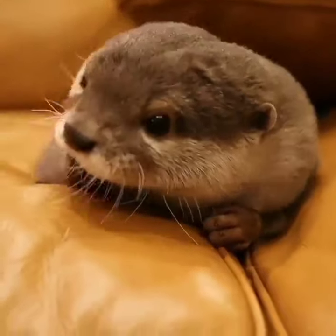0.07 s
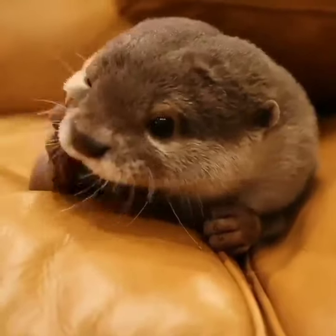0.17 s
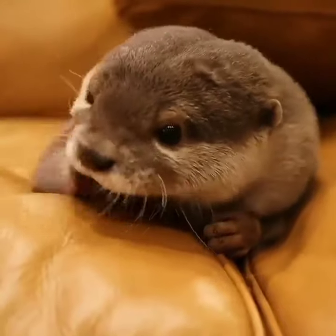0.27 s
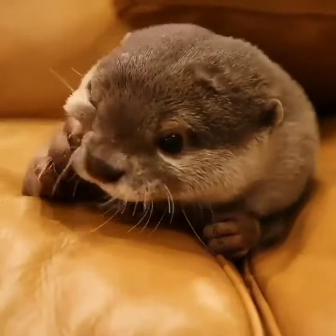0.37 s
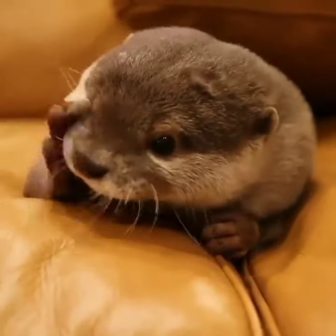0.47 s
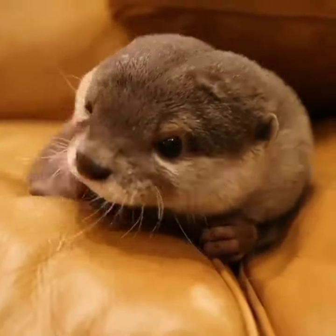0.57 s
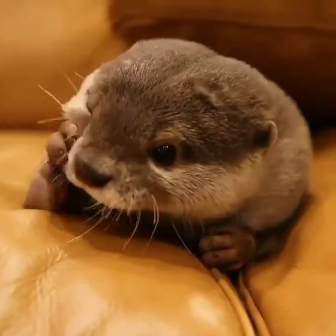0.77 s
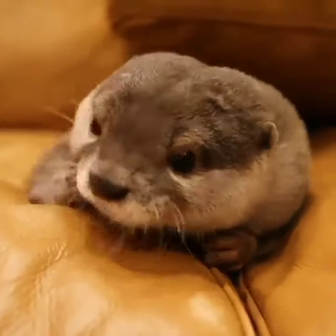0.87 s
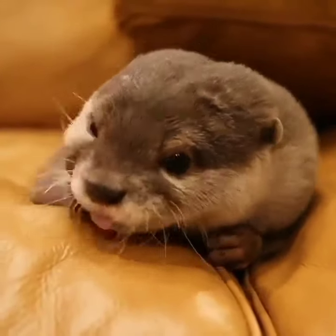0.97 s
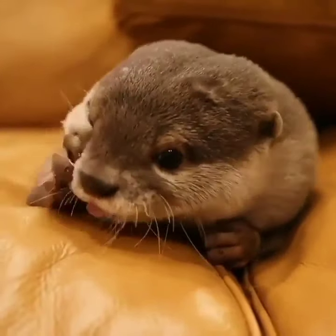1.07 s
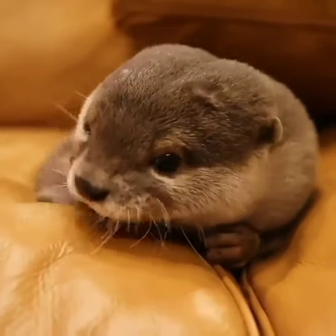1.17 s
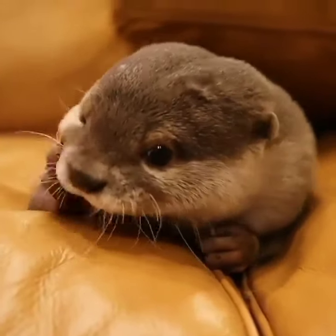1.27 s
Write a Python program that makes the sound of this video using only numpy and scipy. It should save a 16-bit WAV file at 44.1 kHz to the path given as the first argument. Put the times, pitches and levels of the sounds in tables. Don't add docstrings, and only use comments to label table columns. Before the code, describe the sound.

Single high otter squeal rises, wavers and sinks, then faint lip smacks over soft room hiss

```python
import sys
import numpy as np
from scipy import signal
from scipy.fft import rfft, irfft, next_fast_len
from scipy.io import wavfile
from scipy.ndimage import uniform_filter1d, map_coordinates

SR = 44100
rng = np.random.default_rng(int(sys.argv[2]) if len(sys.argv) > 2 else 0)


def waveform_to_disk(signal):
    frames = np.transpose(np.atleast_2d(signal))
    scaled = np.clip(frames, -1, 1) * 32767
    samples = np.round(scaled).astype(np.int16)
    wavfile.write(sys.argv[1], SR, samples)


def boost(x):
    u = np.asarray(x, float) / 20
    return 10 ** u


N = 57330


def unit(x):
    return x / np.sqrt(np.mean(x ** 2) + 1e-20)


def along(points, hz):
    f, v = np.transpose(points)
    return np.interp(np.log(hz + 1), np.log(f + 1), v)


def wobble(rate):
    knots = rng.standard_normal(int(N * rate / SR) + 4)
    return map_coordinates(knots, [np.arange(N) * rate / SR])


def filtered(x, response):
    m = next_fast_len(N + SR // 2)
    return irfft(rfft(x, m) * response(np.fft.rfftfreq(m, 1 / SR)), m)[..., :N]


def gate(start, end, rise, fall):
    t = np.arange(N) / SR
    return np.clip((t - start) / rise + .5, 0, 1) * np.clip((end - t) / fall + .5, 0, 1)


def patchy(depth_db):
    z = signal.stft(rng.standard_normal((2, N)), nperseg=512)[2]
    field = uniform_filter1d(rng.standard_normal(z.shape[1:]), size=7, axis=0)
    field = uniform_filter1d(field, size=9, axis=1)
    return signal.istft(z * boost(depth_db * unit(field)), nperseg=512)[1][:, :N]


def squeal(count=11):
    # start_s, pitch_hz, level_db, chest_tone_over_level_db, brightness_db
    call = [(0.213, 776, -36.5, 8.5, -4), (0.227, 792, -37, 8, 3), (0.255, 815, -33, 3, -0.5),
            (0.283, 852, -29, -15, 2.5), (0.313, 898.8, -25.5, -7, 1), (0.367, 888.5, -23, -6, 3.5),
            (0.407, 939.2, -20.5, -4, 4.5), (0.471, 909.3, -21.5, -6.5, 3),
            (0.541, 930.9, -20.5, -6.5, 1.5), (0.619, 914, -23, -5.5, 0), (0.705, 838.3, -26, -1, 1.5),
            (0.747, 841.7, -25.5, 2.5, 0.5), (0.805, 809, -28.5, -6, 2), (0.837, 808.6, -28.5, -0.5, -1),
            (0.927, 803, -31, -1, 1.5), (0.983, 807, -40.5, 9.5, 5), (0.988, 813, -37, 12, 6)]
    # frequency_hz, gain_db
    throat = [(1500, -5.5), (1850, 1.5), (2400, -7), (2800, -8), (3600, -26.5), (5500, -25.5),
              (7200, -31.5), (8300, -23)]
    # frequency_hz, share
    fuzz = [(1800, 0.056), (2800, 0.15), (3700, 0.36), (9000, 0.51)]
    # frequency_hz, lead_rad
    port_lead = [(900, .12), (1900, .25), (2700, 1.1), (4000, 1.5), (9000, 1.6)]
    # frequency_hz, wander_rad
    head_drift = [(900, .1), (2700, .2), (4000, .9), (9000, 1.3)]
    attack_s, release_s, end_s, gulp_s = .006, .005, .983, .006
    t = np.arange(N) / SR
    s, *cols = np.transpose(call)
    hz, level_db, chest_db, bright_db = [uniform_filter1d(np.interp(t, s, c), size=300) for c in cols]
    hz = hz * (1 + 0.0026 * wobble(250) + 0.00482 * wobble(45.03))

    gulp = np.exp(-((t - end_s + gulp_s) / gulp_s) ** 2)
    chest_db = chest_db + 4.5 * gulp
    hz = hz + 45 * gulp

    turn = 2 * np.pi * np.cumsum(hz) / SR
    strain = np.interp(hz, [797, 852], [.5, 1])
    sides = np.array([[1], [-1]])
    voice = 0
    for k in range(1, count + 1):
        db = chest_db
        if k > 1:
            db = along(throat, k * hz) - along(throat, 2 * hz) + bright_db * min(k - 2, 3) / 3
        scatter = np.array([wobble(170) + 1j * wobble(170), wobble(170) + 1j * wobble(170)])
        flutter = 1 + along(fuzz, k * hz) * strain * scatter
        lead = along(port_lead, k * hz) + along(head_drift, k * hz) * wobble(18.39)
        phase = k * turn + lead / 2 * sides - 0.268 * k * k
        late_s = (k - 1) * 0.0044
        opening = gate(s[0] + late_s / 2, 2, attack_s + late_s, 1)
        level = boost(db + 0.5 * wobble(29.83))
        voice = voice - (level * flutter * opening * np.exp(1j * phase)).real

    air = unit(filtered(rng.standard_normal((2, N)), lambda f: (f > 3300) * (f < 9700)))
    air = air * (1 + np.cos(turn))
    voice = np.sqrt(2) * voice + boost(-30 + bright_db + 4.4 * wobble(13)) * air
    return voice * boost(level_db) * gate(s[0], end_s, attack_s, release_s)


def catches():
    # start_s, pitch_hz, level_db, length_s
    bursts = [
        (0.203, 916, -29.5, 0.0132),
    ]
    t, out = np.arange(N) / SR, np.zeros(N)
    for s, hz, db, length in bursts:
        swell = np.sin(np.pi * np.clip((t - s) / length, 0, 1))
        out += boost(db) * np.sqrt(2) * swell * np.sin(2 * np.pi * hz * (t - s))
    return out


def smacks():
    # peak_s, level_db, top_hz
    lips = [
        (.979, -44, 2200),
        (1.132, -47, 3400),
        (1.224, -54, 6500),
    ]
    t, out = np.arange(N) / SR, np.zeros(N)
    for s, db, top_hz in lips:
        puff = rng.standard_normal(N)
        puff = unit(filtered(puff, lambda f: f / (f + top_hz / 3) / (1 + (f / top_hz) ** 8)))
        t60 = np.where(t > s, .06, .03)
        out += boost(db - 60 * np.abs(t - s) / t60) * puff
    return out


def leaks():
    # middle_s, length_s, level_db
    swells = [
        (0.261, 0.11, -46.5),
        (0.352, .035, -47.5),
        (0.4, 0.027, -47),
        (.55, 0.027, -58),
        (0.674, 0.076, -49),
        (0.766, 0.071, -49.5),
        (0.97, 0.026, -53.5),
        (1.048, 0.19, -55),
    ]
    # frequency_hz, density_db_per_hz
    colour = [(1800, -6), (2300, 5), (3200, -17), (4200, 7), (6500, -8.5), (8500, 0), (9700, -8.5)]
    t = np.arange(N) / SR
    swell = sum(boost(db) * np.exp(-(2 * (t - s) / length) ** 2) for s, length, db in swells)
    air = filtered(patchy(2.5), lambda f: boost(along(colour, f)) * (f > 1500) * (f < 9700))
    return swell * unit(air)


def thumps():
    # start_s, level_db, pitch_hz, t60_s
    pushes = [
        (.575, -33, 62, .25),
        (.645, -35, 66, .2),
        (1.02, -41, 66, .25),
        (.53, -44, 55, .1),
        (.86, -46, 52, .3),
        (.77, -42, 95, .2),
    ]
    out = np.zeros(N)
    for s, db, hz, t60 in pushes:
        t = np.clip(np.arange(N) / SR - s, 0, None)
        out += boost(db - 60 * t / t60) * (1 - np.exp(-t / 0.012)) * np.sin(2 * np.pi * hz * t) * 2
    return out


def hum():
    # frequency_hz, level_db
    lines = [(49, -56.5), (100, -47), (147, -54.5), (188, -53.5)]
    t, out = np.arange(N) / SR, 0
    for hz, db in lines:
        level = boost(db + 1.5 * wobble(9)) * np.sqrt(2)
        out = out + level * np.sin(2 * np.pi * hz * t + 1.2 * wobble(7))
    return out


def hiss():
    # frequency_hz, density_db_per_hz
    colour = [(18, -33), (30, -4), (161, -11), (193, -7), (590, -13), (910, -12.5), (1370, -16.5),
              (3420, -22.5), (13200, -34.5)]
    # frequency_hz, correlation
    alike = [(60, 1.0), (180, 0.97), (520, 0.33), (1520, -0.02), (4450, -0.2), (13100, -0.067)]

    def mid_side(hz):
        angle = np.arccos(np.clip(along(alike, hz), -1, 1)) / 2
        return boost(along(colour, hz)) * (hz > 34) * [np.cos(angle), np.sin(angle)]

    mid, side = filtered(patchy(1.5), mid_side)
    level = boost(-40.5 - 2.5 + 0.68 * wobble(5.55))
    return level * unit(np.array([mid + side, mid - side]))


def room(x):
    # delay_s, left_gain, right_gain
    echoes = [(.0017, -0.074, -.06), (.0041, .08, .06), (.009, .1, 0.074), (.016, -.07, -.03)]
    # frequency_hz, t60_s
    decay = [(200, 0.27), (800, 0.64), (2000, 0.33), (10000, 0.23)]
    delay, *gains = np.transpose(echoes)
    pan = boost(np.array([[0.36], [-0.36]]))
    near = filtered(x, lambda f: pan * (1 + np.array(gains) @ np.exp(-2j * np.pi * delay[:, None] * f)))

    hz, t, z = signal.stft(rng.standard_normal((2, SR // 3)), SR, nperseg=256)
    tail = signal.istft(z * boost(-60 * t / along(decay, hz)[:, None]), SR, nperseg=256)[1]
    shared = .7
    tail = shared * tail[0] + (1 - shared) * tail * [[1], [2]]
    late = np.pad(x, ((0, 0), (500, 0)))
    far = signal.fftconvolve(late, tail / np.linalg.norm(tail[0]), axes=1)[:, :N]
    return near + boost(-15) * far


def scene():
    return room(squeal() + catches() + smacks()) + leaks() + thumps() + hum() + hiss()


def top_band(dry, split_hz, from_hz=3445, shift_hz=6201.6, top_hz=13780):
    # frequency_hz, gain_db
    colour = [(9600, -3.5), (10800, -2), (11800, -1.5), (12900, -9), (13100, -18), (13700, -20)]
    # level_db, start_s, end_s
    tone_times = [(-47, .395, .63), (-55, .395, .63), (-57, .395, .63)]
    tone_hz = [10163.7, 12231, 12920]
    t = np.arange(N) / SR
    middle = filtered(dry, lambda f: (f > from_hz) * (f < top_hz - shift_hz))
    middle = signal.hilbert(middle, axis=1)
    swell = np.sqrt(np.abs(uniform_filter1d(np.abs(middle) ** 2, size=600, axis=1)))
    copy = (middle * np.exp(2j * np.pi * shift_hz * t)).real
    copy = copy + boost(-8.5) * swell * rng.standard_normal(dry.shape)
    copy = copy * (swell / boost(-46.5)) ** 0.38
    top = filtered(copy, lambda f: boost(along(colour, f)) * (f > split_hz))
    for hz, (db, start, end) in zip(tone_hz, tone_times):
        level = boost(db + 1.6 * wobble(25)) * np.sqrt(2) * gate(start, end, .02, 0.053)
        top = top + level * np.sin(2 * np.pi * hz * t)
    return top


def masked(x, size=1536):
    # frequency_hz, threshold_db
    threshold = [(900, -59), (1120, -28), (1350, -56), (1650, -37), (2200, -37), (3200, -36), (9000, -38),
                 (10200, -36), (13200, -41.5)]
    hz, _, z = signal.stft(x, SR, nperseg=size, noverlap=size * 3 // 4)
    power = uniform_filter1d(np.mean(np.abs(z) ** 2, 0), size=3, axis=1) + 1e-16
    width = max(round(150 / hz[1]), 1)
    band = np.abs(uniform_filter1d(power, width, axis=0)) * width + 1e-18
    weighted = power * np.clip(hz / 1600, 0, 1)[:, None] ** 2
    moment = weighted[hz > 700].sum(0)
    over_db = 10 * np.log10(band / moment) - along(threshold, hz)[:, None]
    keep = 1 / (1 + np.exp(-np.clip(over_db / 0.6, -12, 12)))
    return signal.istft(z * keep, SR, nperseg=size, noverlap=size * 3 // 4)[1][:, :N]


def roll_off(x):
    return signal.sosfilt(signal.butter(12, 13670, fs=SR, output="sos"), x)


def record(dry):
    split_hz = 3445 + 6201.6
    low = filtered(dry, lambda f: f < split_hz)
    mix = masked(low + top_band(dry, split_hz))
    return roll_off(mix)


dry = scene()
out = record(dry)
waveform_to_disk(out)
```